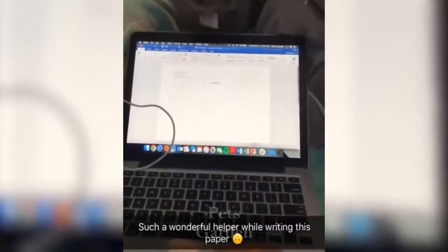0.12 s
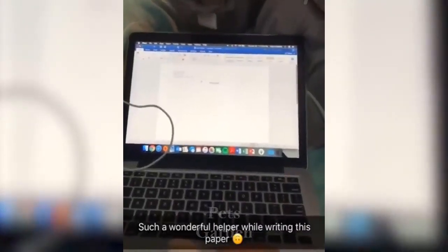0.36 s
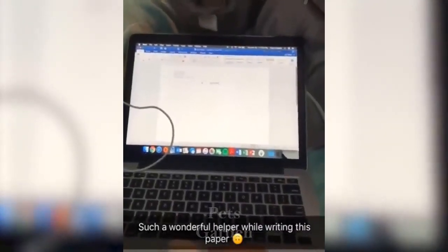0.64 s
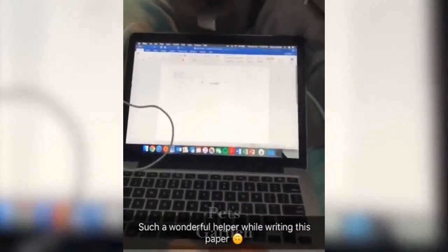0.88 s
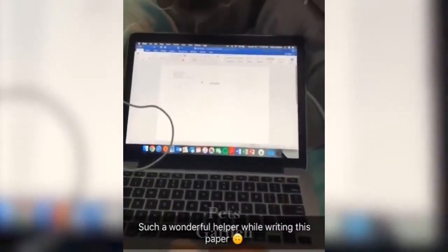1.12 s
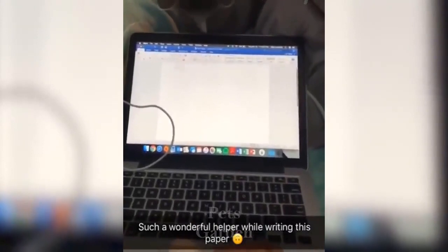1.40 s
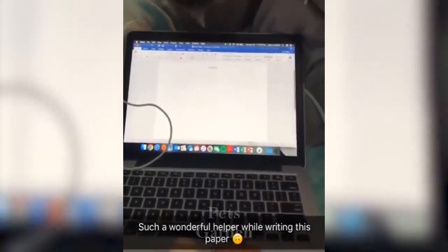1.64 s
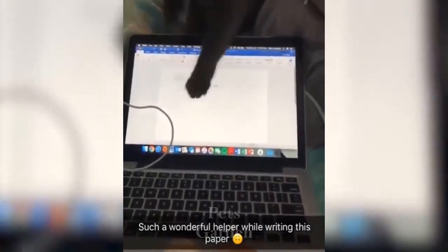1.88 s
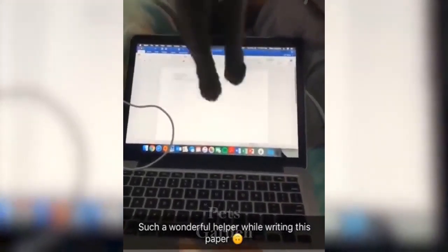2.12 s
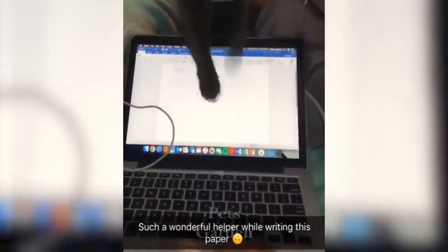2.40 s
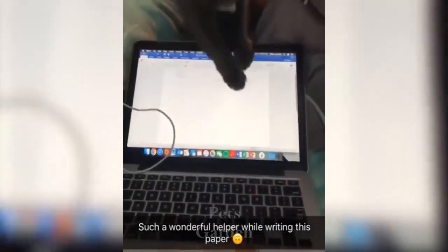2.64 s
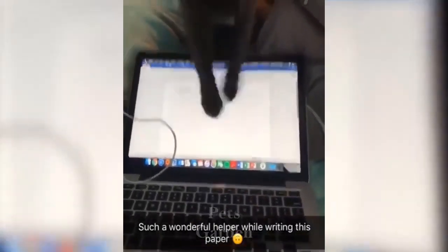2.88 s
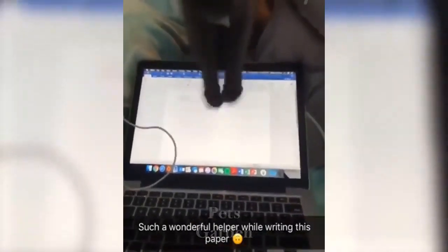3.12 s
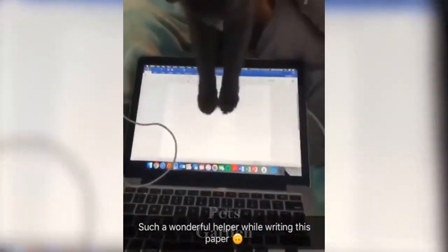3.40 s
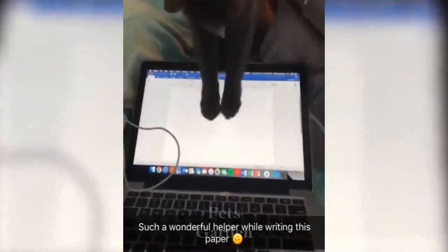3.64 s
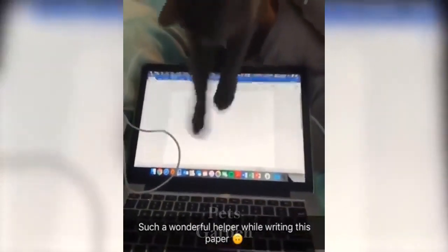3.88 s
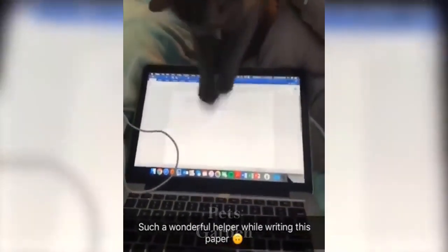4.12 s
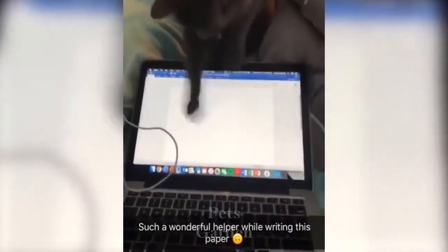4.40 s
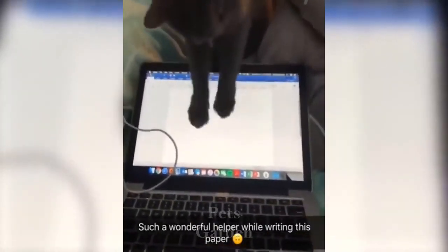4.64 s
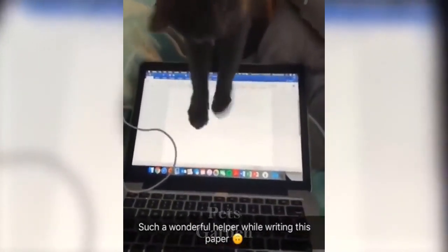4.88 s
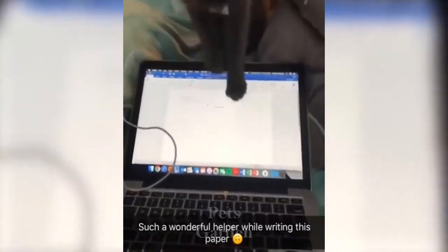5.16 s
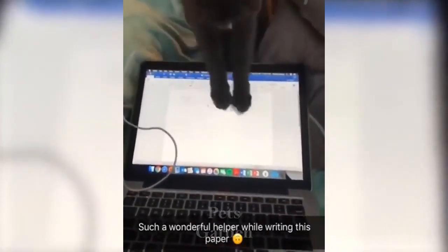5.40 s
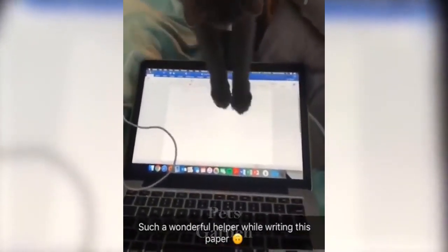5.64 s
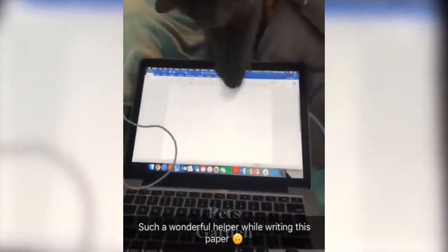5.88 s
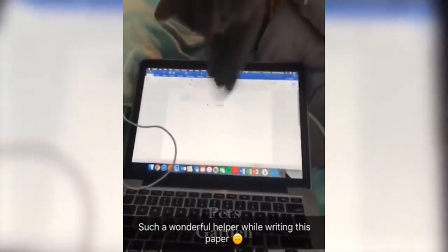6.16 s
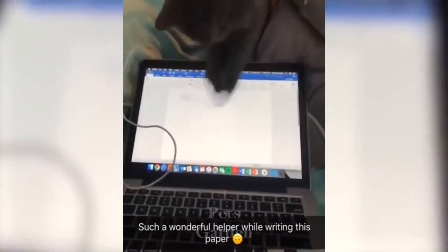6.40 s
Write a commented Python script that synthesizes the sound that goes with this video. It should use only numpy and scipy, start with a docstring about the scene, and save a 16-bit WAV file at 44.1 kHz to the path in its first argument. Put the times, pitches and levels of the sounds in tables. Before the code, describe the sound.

For the first 1.8 seconds there is only quiet room air, faint mains hum and a few very soft distant clinks. At about 1.8 a low lid thump arrives, then at 1.9 the loudest sharp claw tap on glass. Around 2.15 a soft touch brings a small collar bell, which tinkles more clearly with a dull knock near 2.6 and again near 3.0. Brisk dry ticks with light knocks follow at 3.2 to 3.5, then a lull with faint bell rattles. A denser run of claw chatter, pad rubbing and lid thumps fills 4.0 to 4.65, with a fuller knock near 4.55. After another pause, taps and brief drags come from 5.1 to 5.5, faint bell touches until 5.8, and separate clicks with rubs from 6.1 to 6.5. Close handheld mono pickup, low hand rumble, short soft room echo.

```python
"""Claws tick on glass in quick bunches, a lid knocks, pads drag and a small collar bell tinkles: a cat paws at the
screen of an open laptop. Quiet room air, mains hum, hand rumble and a few soft, distant clinks lie underneath.
Knocks are damped sines, the bell rings sine modes, ticks and clinks are noise bursts through resonances, and
rubbing and air are shaped noise; impacts echo in the room. A hand-held phone hears it with one microphone."""
import sys
import numpy as np
from scipy import signal
from scipy.fft import rfft, irfft, next_fast_len
from scipy.io import wavfile
from scipy.ndimage import uniform_filter1d, map_coordinates

SR = 44100
rng = np.random.default_rng(int(sys.argv[2]) if len(sys.argv) > 2 else 0)


def how_loud(loudness_db):
    """Turn decibels into a plain amplitude multiplier (0 dB gives 1, 20 dB gives 10)."""
    steps = np.asarray(loudness_db, float) / 20
    return 10 ** steps


def unload_audio(sound):
    """Save the sound as a 16-bit wav file, at the path given as the first command line argument."""
    columns = np.transpose(np.atleast_2d(sound))
    # keep every value between -1 and 1, then stretch to whole-number steps
    steps = np.round(np.clip(columns, -1, 1) * 32767)
    wavfile.write(sys.argv[1], SR, steps.astype(np.int16))


N = 287401


def unit(x):
    """Scale to rms 1."""
    return x / np.sqrt(np.mean(x ** 2) + 1e-20)


def along(points, hz):
    """(frequency [Hz], value) points read on a log frequency axis."""
    f, v = np.transpose(points)
    return np.interp(np.log(hz + 1), np.log(f + 1), v)


def curve(rows):
    """(time [s], value) rows interpolated to one value per sample."""
    return np.interp(np.arange(N) / SR, *np.transpose(rows))


def wobble(rate_hz):
    """Smooth random curve through rate_hz normal-distributed knots a second."""
    knots = rng.standard_normal(int(N * rate_hz / SR) + 4)
    return map_coordinates(knots, [np.arange(N) * rate_hz / SR])


def filtered(x, response):
    """x filtered by a complex response of frequency."""
    m = next_fast_len(len(x) + 4096)
    return irfft(rfft(x, m) * response(np.fft.rfftfreq(m, 1 / SR)), m)[:len(x)]


def noise(spectrum):
    """Coloured noise of rms 1."""
    return unit(filtered(rng.standard_normal(N), lambda hz: how_loud(along(spectrum, hz))))


def patchy(x, depth_db):
    """Random gain patches, about 600 Hz by 50 ms; result of rms 1."""
    z = signal.stft(x, nperseg=512)[2]
    smooth_in_hz = uniform_filter1d(rng.standard_normal(z.shape), 7, 0)
    field = uniform_filter1d(smooth_in_hz, 8, 1)
    patched = signal.istft(z * how_loud(depth_db * unit(field)), nperseg=512)[1]
    return unit(patched[:len(x)])


def rung(x, modes):
    """x through broad resonances (centre [Hz], width [Hz], level [dB]), steep skirts, peak brought to 1."""
    def response(f):
        return sum(how_loud(db) * (1j * f * w / (c * c - f * f + 1j * f * w)) ** 2 for c, w, db in modes)

    y = filtered(x, response)
    return y / np.abs(y).max()


def add(out, s, sound):
    """Mix sound in at time s."""
    part = out[round(s * SR):][:len(sound)]
    part += sound[:len(part)]


def room(x):
    """Wall echo delayed 3 ms, swelling near 14 ms; in the tail each frequency dies at its own speed."""
    # decay: (frequency [Hz], t60 [s])
    decay = [(150, 0.21), (1200, 0.29), (3500, 0.25), (7000, 0.41), (12000, 0.12)]
    # soft furnishings dull the echo: (frequency [Hz], level [dB])
    furnishings = [(300, -8.5), (1200, -2), (3500, -5.5), (6000, -7), (12000, -6)]
    hz, t, z = signal.stft(rng.standard_normal(SR // 3), SR, nperseg=128)
    fade_db = along(furnishings, hz)[:, None] - 60 * t / along(decay, hz)[:, None]
    tail = signal.istft(z * how_loud(fade_db), SR, nperseg=128)[1]
    t = np.arange(len(tail)) / SR
    onset = 1 - np.exp(-(t / 0.0032) ** 2)
    swell = 1 + 1.2 * np.exp(-((t - 0.011) / 0.011) ** 2)
    tail = tail * onset * swell
    delayed = np.pad(x, (round(0.003 * SR), 0))
    return signal.fftconvolve(delayed, tail / np.linalg.norm(tail))


def background():
    """Patchy room air, slightly unsteady mains hum and the low rumble of the shaking hand."""
    # air colour: (frequency [Hz], relative density [dB per Hz])
    air_spectrum = [(24, -30), (40, -9.5), (103, -6), (129, -7), (145, -14), (210, -13), (249, -14.5),
                    (415, -25), (555, -26), (1470, -30.5), (1620, -32), (2020, -30.5), (4850, -43.5),
                    (10600, -45.5), (13500, -61)]
    # mains hum sines: (frequency [Hz], amplitude before hum_gain_db [dB])
    hum_lines = [(59.5, -58.5), (119.5, -58)]
    # hand rumble colour: (frequency [Hz], relative density [dB per Hz])
    hand_spectrum = [(12, -13), (22, 11), (45, -5), (70, 0), (110, -19.5), (200, -107)]
    # the phone shakes in the hand: (time [s], level [dB])
    shake_levels = [(0.0, -63.5), (1.72, -56.5), (1.78, -36), (1.94, -54), (1.98, -40), (2.36, -68),
                    (2.57, -54.5), (2.61, -33.5), (2.66, -44), (2.9, -54.5), (3.06, -48.5), (3.99, -56.5),
                    (4.41, -45.5), (4.53, -57), (4.59, -40.5), (4.8, -66), (5.09, -55), (6.51, -54.5)]
    air_db, hum_gain_db = -55.0, 0.5
    t = np.arange(N) / SR
    hum = 0
    for hz, db in hum_lines:
        level = how_loud(db + hum_gain_db + 0.81 * wobble(6.8))
        hum = hum + level * np.sin(2 * np.pi * hz * t + 0.5 * wobble(14))
    shake = how_loud(curve(shake_levels)) * noise(hand_spectrum)
    air = how_loud(air_db + 0.096 * wobble(3.37)) * patchy(noise(air_spectrum), depth_db=2.0)
    return air + hum + shake


def clinks():
    """Something small touches far off: a soft noise brush with a thin metal ring, heard only via the room."""
    # (time [s], brush level before the room [dB], brush pitch [Hz])
    touches = [(.0, -55.5, 3000), (.308, -48.5, 2650), (0.822, -53, 2900), (1.19, -57.5, 5800),
               (3.118, -50.5, 4200), (5.72, -48, 2840), (6.261, -46.5, 3600)]
    ring_hz, ring_re_brush_db = 4070, -7
    out, t = np.zeros(N), np.arange(SR // 5) / SR
    for s, db, hz in touches:
        touch = rng.standard_normal(len(t)) * (1 - np.exp(-t / 0.00064))
        brush = rung(touch * how_loud(-60 * t / 0.12), [(hz, 1.4 * hz, 0)])
        ring = rung(touch * how_loud(-60 * t / 0.2), [(ring_hz, 400, 0)])
        add(out, s, how_loud(db) * room(brush + how_loud(ring_re_brush_db) * ring))
    return out


def pads():
    """Pads and fur rub unevenly over glass and cloth: patchy noise that follows the pressure."""
    # pads wipe down the glass: (time of full pressure [s], level [dB], held [s])
    wipe_rows = [(1.8, -65, .13), (2.17, -56.5, 0.014), (2.62, -59, 0.017), (2.99, -61, 0.13),
                 (3.25, -53, 0.012), (3.44, -61, .03), (4.03, -63, .13), (4.24, -61, 0.027),
                 (4.42, -56.5, 0.2), (5.132, -55, 0.088), (5.5, -59.5, 0.11), (5.76, -73, 0.02),
                 (5.96, -57, 0.087), (6.22, -59.5, 0.086), (6.4, -55.5, 0.067)]
    # rubbing colour: (frequency [Hz], relative density [dB per Hz])
    rub_spectrum = [(300, -26), (600, 0), (900, -16), (1280, -2.5), (2200, -12), (3000, -11), (4100, -8),
                    (5200, -16), (7000, -22), (11600, -23), (13000, -11.5)]
    press_db_per_s, lift_db_per_s = 163, 115
    fur_db = -75  # faint rustle throughout
    t = np.arange(N) / SR
    wipes = 0
    for s, db, held_s in wipe_rows:
        press_db = press_db_per_s * np.clip(s - t, 0, 2)
        lift_db = lift_db_per_s * np.clip(t - s - held_s, 0, 2)
        wipes = wipes + how_loud(db - press_db - lift_db)
    uneven_db = 1.5 * wobble(30) + 3.5 * wobble(400)
    return (wipes + how_loud(fur_db)) * patchy(how_loud(uneven_db) * noise(rub_spectrum), depth_db=2)


def claws():
    """Each claw chatters on the glass for a few ms; the contact rings tip, pane, lid and edge."""
    # (time [s], tick level [dB], tick pitch [Hz], lid knock re tick [dB], bright edge re tick [dB])
    taps = [(1.8089, -51.5, 3850, 18.5, -23), (1.9006, -10.5, 3190, -7.5, -18),
            (2.164, -43.5, 4870, 5, -10), (2.5916, -41.5, 4870, 2, -4), (2.63, -41, 4830, -3.5, -2),
            (3.016, -38.5, 2980, 3, -2), (3.0271, -32, 4140, -14, -11), (3.218, -41.5, 2960, -22, -2),
            (3.233, -22.5, 4160, -4, -6.5), (3.2416, -22.5, 4300, -9.5, -10), (3.367, -51.5, 3480, -9, -25),
            (3.4307, -19.5, 4080, -10, -9.5), (3.5123, -29, 3000, -2.5, 1), (4.0168, -29, 3420, -4, -11),
            (4.0584, -51, 3430, 7, -4), (4.1949, -24, 3300, -4, -9.5), (4.201, -44.5, 2780, 11.5, -20),
            (4.2133, -21, 3460, -4.5, -11.5), (4.2488, -43.5, 2370, 5.5, -18),
            (4.3586, -26.5, 4000, -0.5, -8), (4.3637, -33.5, 4050, -9, -4), (4.377, -23.5, 4130, -6, -7),
            (4.3849, -34, 3530, 2, -29), (4.414, -37, 3170, 7, -27), (4.5198, -37, 3780, -22, -21),
            (4.5267, -35, 3980, -21, -13), (4.5347, -37, 4040, -18, -8), (4.557, -21.5, 3720, -1, -8),
            (4.6421, -27.5, 3480, -5.5, -3.5), (4.6469, -32, 2550, -0.5, -21),
            (5.1157, -56.5, 4400, 16, -11), (5.1591, -41, 4160, -9, -13), (5.1667, -38, 3570, -14, -10),
            (5.1793, -34, 4080, -23, -20), (5.2597, -19, 3770, -8.5, -13), (5.4069, -30, 3430, -7, -6.5),
            (5.503, -32.5, 3720, -4.5, -19), (5.5235, -42, 3460, -3.5, -27), (6.0818, -30.5, 3680, -5, -6),
            (6.1657, -25, 3580, -8, -7.5), (6.3445, -20, 3400, -14.5, -10), (6.4348, -24, 2980, -4.5, -7.5),
            (6.4596, -29.5, 4100, -21, -15)]
    # resonances of pane, lid and edge: (centre [Hz], width [Hz], level [dB])
    pane_modes = [(2660, 2000, -26), (3550, 2220, -2)]
    lid_modes = [(366, 575, 11.5), (612, 300, 1.5), (1218, 473, 17.5), (1884, 810, -5)]
    edge_modes = [(6530, 3460, 24.5), (9660, 1800, 25), (11060, 600, 22.5)]
    contact_ms, echo_re_tap_db = 4.27, -11.5
    out, t = np.zeros(N), np.arange(SR // 20) / SR

    def blunt(x, corner_hz):
        """Fourth-order low-pass: a soft contact excites little treble."""
        return filtered(x, lambda f: 1 / (1 + 1.4j * f / corner_hz - (f / corner_hz) ** 2) ** 2)

    def body(x, hz, lid_db, edge_db):
        """Contact x rings tip and pane, lid and edge in parallel."""
        tick = rung(blunt(x, 1.28 * hz), [(hz, 700, 0)] + pane_modes)
        knock = rung(blunt(x, 2660), lid_modes)
        return tick + how_loud(lid_db) * knock + how_loud(edge_db) * rung(x, edge_modes)

    for s, db, hz, lid_db, edge_db in taps:
        grit = rng.standard_normal(len(t)) * np.abs(rng.standard_normal(len(t)))
        chatter = grit * (1 - np.exp(-t / 0.00028)) * np.exp(-(1000 * t / contact_ms) ** 2)
        chatter[round(0.0004 * SR)] = 0.5 * np.linalg.norm(chatter)  # one firm contact early on
        tap = body(chatter, hz, lid_db, edge_db)
        # all directions together: the smooth colour of the body
        spread = body(1.0 * (t == 0), hz, lid_db, edge_db)
        echo_gain = how_loud(db + echo_re_tap_db) * np.linalg.norm(tap) / np.linalg.norm(spread)
        add(out, s, how_loud(db) * tap)
        add(out, s, echo_gain * room(spread))
    return out


def lid():
    """Lid and hinge are pushed: a low swing with a weaker overtone, quickly damped by the bedding."""
    # (time [s], nominal peak level [dB], pitch [Hz])
    thumps = [(1.811, -19, 149.4), (1.904, -22.5, 153), (2.167, -30, 129), (2.6, -22.5, 81.5),
              (2.596, -26, 330), (2.63, -29, 340), (3.019, -27.5, 160), (3.236, -29, 195),
              (3.438, -30, 129.6), (3.514, -28.5, 155), (4.019, -32.5, 151), (4.095, -36, 113),
              (4.2, -28, 113), (4.368, -30, 67), (4.383, -31.5, 225), (4.565, -20.5, 217),
              (4.643, -34, 150), (5.166, -28, 151), (5.258, -29.5, 167), (5.409, -37, 141),
              (6.082, -34.5, 190), (6.169, -34, 143), (6.349, -29.5, 147), (6.437, -27.5, 151)]
    swings = 6.7  # cycles until a push has died by 60 dB
    out, t = np.zeros(N), np.arange(SR // 4) / SR
    for s, db, hz in thumps:
        overtone = 0.68 * np.sin(2 * np.pi * 1.734 * hz * t) * how_loud(-60 * t / 0.067)
        swing = np.sin(2 * np.pi * hz * t) + overtone
        push = -swing * how_loud(db - 60 * t * hz / swings) * (1 - np.exp(-t / 0.0015))
        add(out, s, push)
        add(out, s, how_loud(-4.0) * room(push))
    return out


def bell():
    """The pellet strikes the shell and rattles on; every touch ticks and rings two close pairs of modes."""
    # strikes: (time [s], low pair level [dB], high pair level [dB])
    tinkles = [(2.146, -46, -71), (2.1646, -27.5, -69), (2.174, -36, -60), (2.2722, -45, -81),
               (2.56, -39, -66), (2.5971, -22, -51), (2.6134, -28.5, -60), (2.6249, -32, -65),
               (2.6394, -37, -60), (2.72, -46, -77), (2.7631, -43, -77), (2.9657, -43.5, -79.5),
               (2.996, -38, -65), (3.022, -27, -57), (3.5867, -40.5, -67), (3.673, -45, -79),
               (3.7576, -42, -74), (3.851, -49, -86), (3.922, -48.5, -69), (3.9664, -50, -66),
               (4.0945, -45, -55), (4.2857, -52, -58), (4.629, -46, -79), (4.6957, -44, -82),
               (4.7117, -41, -60), (4.7253, -46, -71), (5.3194, -38, -63), (5.3344, -39.5, -66),
               (5.3727, -43, -68), (5.452, -39, -67), (5.4774, -49, -70), (5.6228, -37.5, -59),
               (5.7753, -45, -84), (6.4988, -39, -58)]
    # shell modes: (frequency [Hz], level re the strike's pair level [dB], t60 [s])
    low_pair = [(4850, -17.5, 0.091), (5200, -26, 0.053)]
    high_pair = [(11920, 0, 0.091), (12070, -8.5, .07)]
    tick_re_low_db, touches_per_s = -4, 1500
    out, t = np.zeros(N), np.arange(SR // 6) / SR
    for s, low_db, high_db in tinkles:
        modes = [(hz, db + low_db, t60) for hz, db, t60 in low_pair]
        modes += [(hz, db + high_db, t60) for hz, db, t60 in high_pair]
        ring = sum(how_loud(db - 60 * t / t60) * np.sin(2 * np.pi * hz * t) for hz, db, t60 in modes)
        click = rung(1.0 * (t == 0), [(5150, 1400, 0), (8000, 5000, -30)])
        tick = how_loud(low_db + tick_re_low_db) * click
        hits = rng.random(len(t)) < touches_per_s / SR
        touches = rng.standard_normal(len(t)) * hits * how_loud(-60 * t / 0.05)
        touches[0] = 1.5  # the strike itself
        touches /= np.linalg.norm(touches)
        flutter_db = 4.5 * wobble(130)[:2 * len(t) - 1]
        strike = signal.fftconvolve(touches, ring + tick) * how_loud(flutter_db)
        add(out, s, strike)
        add(out, s, how_loud(-6.0) * room(strike))
    return out


def scene():
    """One microphone feeds both channels."""
    mono = background() + clinks() + pads() + claws() + lid() + bell()
    return np.array([mono, mono])


def top_cut(x):
    """Nothing passes above the cut-off."""
    return signal.sosfilt(signal.butter(12, 13720, fs=SR, output="sos"), x)


def record(dry):
    """The phone rolls off steeply above 12.1 kHz; both channels are alike."""
    # (frequency [Hz], gain [dB])
    rolloff = [(12100, 2.0), (12400, -24), (13600, -35.5), (16500, -60)]
    mono = filtered(dry[0], lambda hz: how_loud(along(rolloff, hz)))
    return top_cut(np.array([mono, mono]))


dry = scene()
out = record(dry)
unload_audio(out)
```